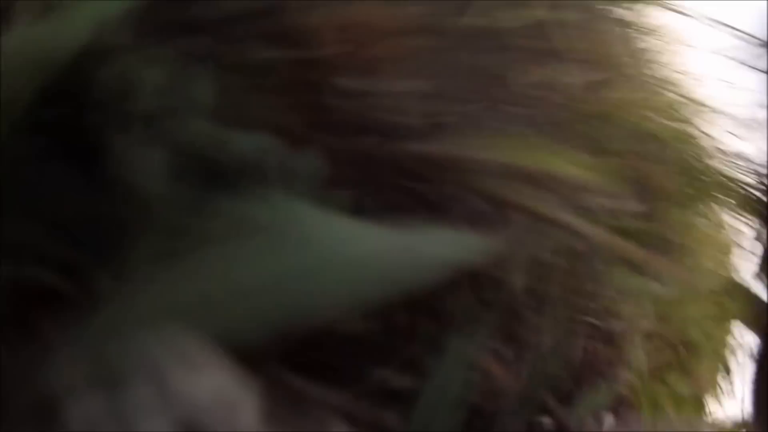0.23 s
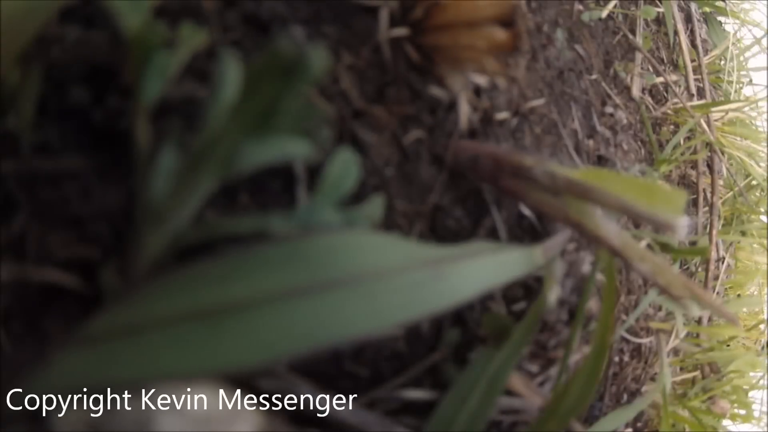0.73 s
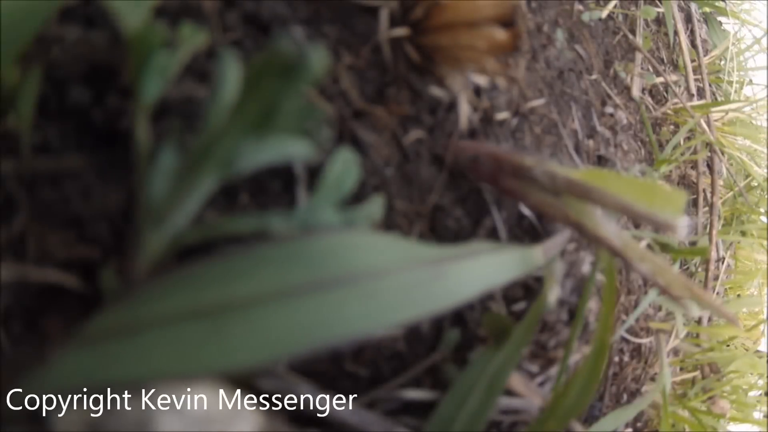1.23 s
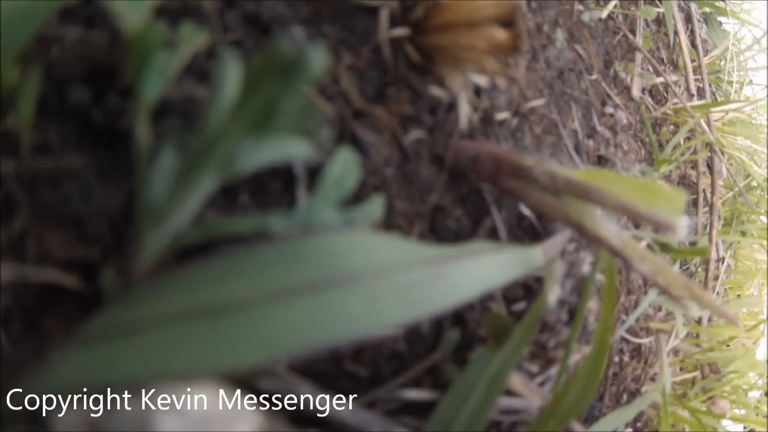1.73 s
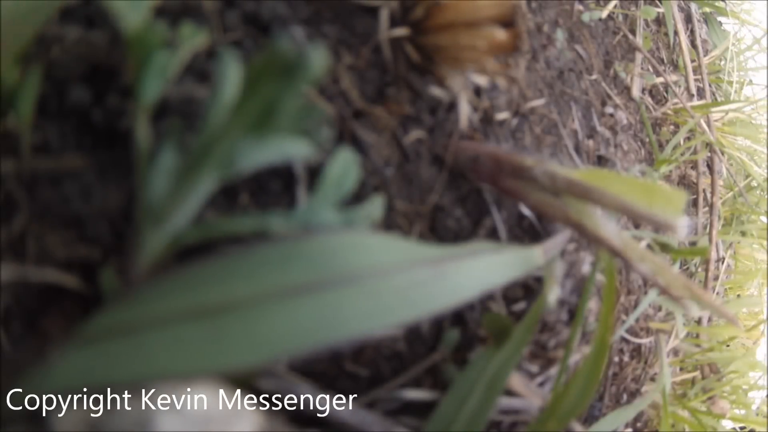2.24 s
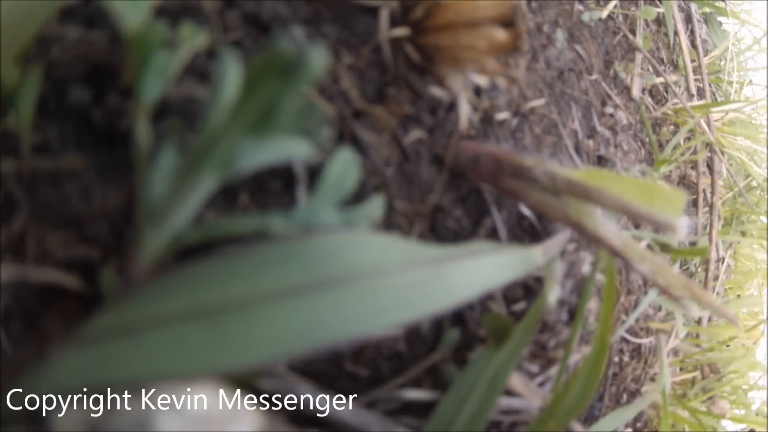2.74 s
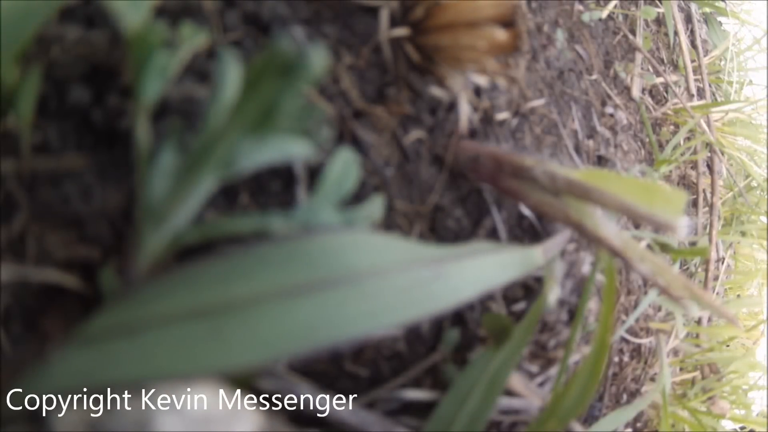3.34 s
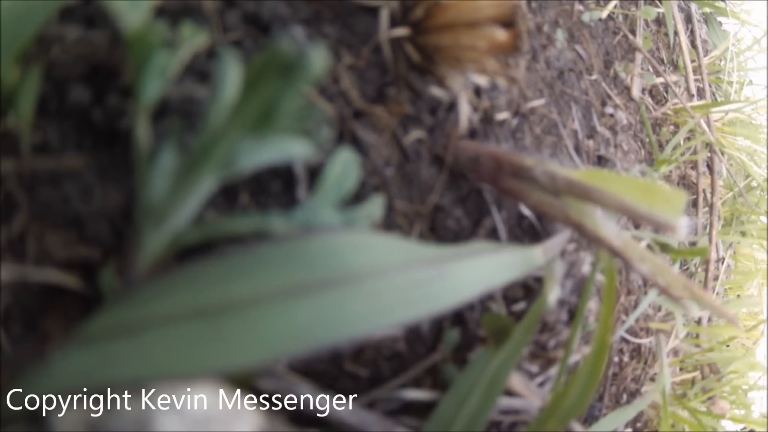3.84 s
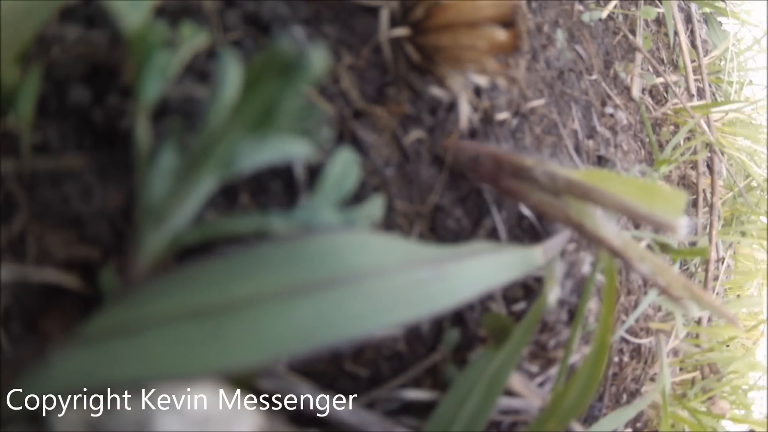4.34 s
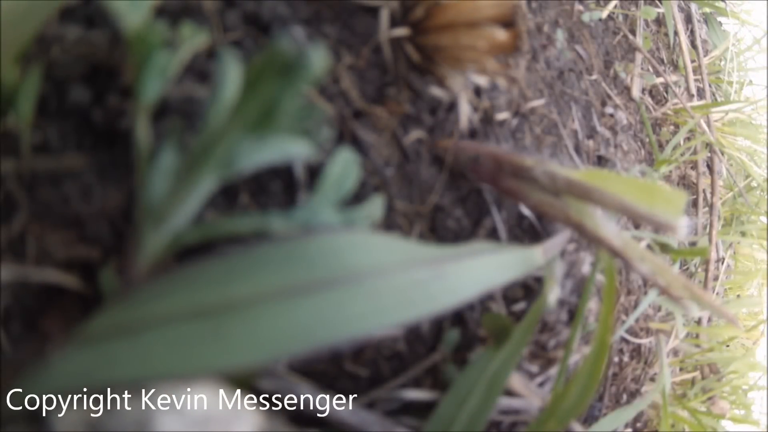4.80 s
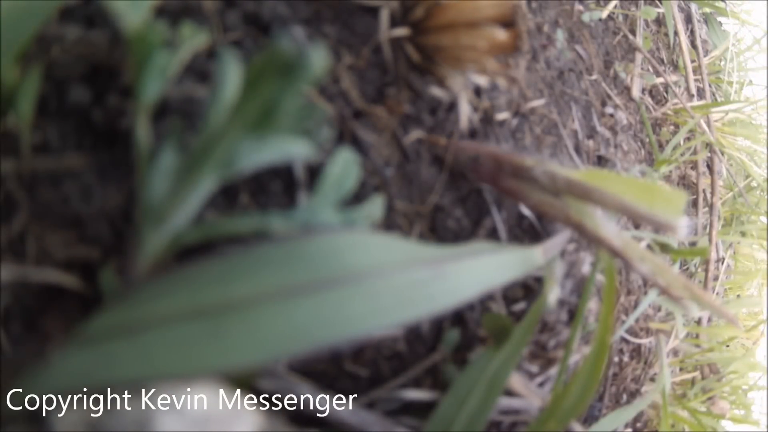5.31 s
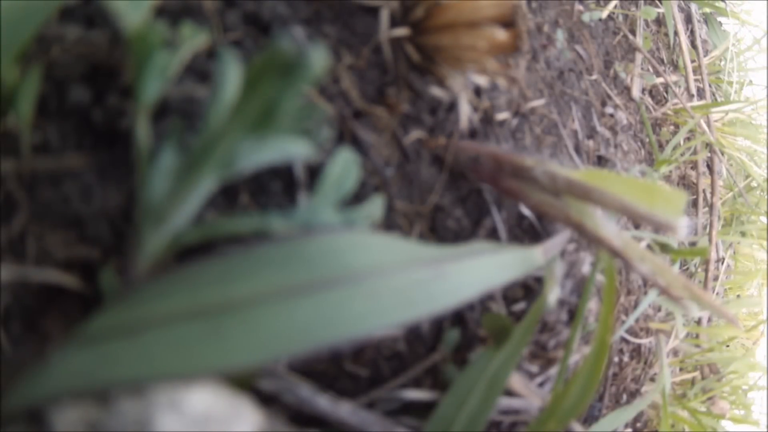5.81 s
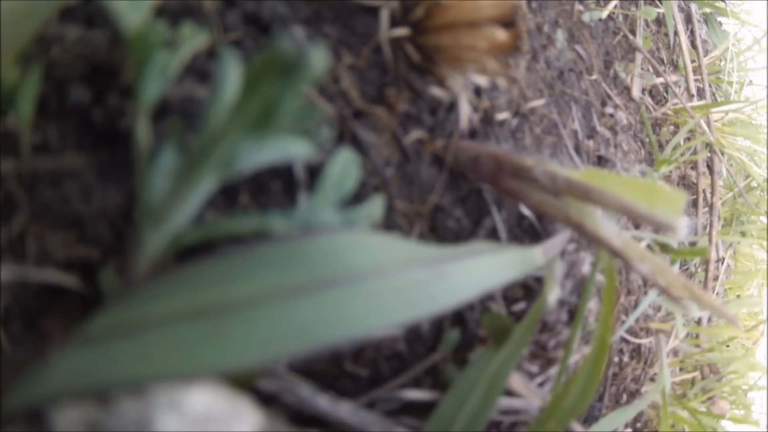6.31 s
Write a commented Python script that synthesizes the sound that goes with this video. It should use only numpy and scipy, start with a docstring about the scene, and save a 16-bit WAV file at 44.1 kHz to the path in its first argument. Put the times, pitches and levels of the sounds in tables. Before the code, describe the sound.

A brief, loud rustling tumble against the microphone gives way to a bird's long run of high, scolding peeps in a pasture.

```python
"""A killdeer scolds in a pasture: a long run of shrill peeps, sung with both sides of its syrinx at once.
As it starts, a cow nudges a small camera, which tumbles through grass and comes to rest on the soil.
Stems scrape and knock on the case, and the cow's shifting thuds through the turf under a dull hush.
The camera holds each sample of a slow converter, which mirrors the whole sound into the treble."""
import sys
import numpy as np
from scipy import signal
from scipy.fft import rfft, irfft
from scipy.io import wavfile
from scipy.ndimage import map_coordinates

SR = 44100
rng = np.random.default_rng(int(sys.argv[2]) if len(sys.argv) > 2 else 0)


def persist_wave(psi):
    """Save psi, clipped to +-1, as 16-bit WAV."""
    counts = np.round(np.clip(psi, -1, 1) * 32767).astype(np.int16)
    wavfile.write(sys.argv[1], SR, np.atleast_2d(counts).T)


N = 289296
TIME_S = np.arange(N) / SR
BIN_HZ = np.arange(N // 2 + 1) * SR / N


def from_db(db):
    """Decibels to gain."""
    return 10 ** (np.asarray(db) / 20)


def unit_rms(x):
    """Scale to unit power."""
    return x / np.sqrt(np.mean(x ** 2) + 1e-20)


def at_hz(points, hz):
    """Interpolate a table on a log-frequency axis."""
    points = np.array(points)
    return np.interp(np.log(np.maximum(hz, 1)), np.log(points[:, 0]), points[:, 1])


def low_pass(x, hz, order=2):
    """Butterworth low-pass."""
    return signal.sosfilt(signal.butter(order, hz, fs=SR, output="sos"), x + 1e-18)


def drift(rate_hz, size):
    """Smooth random curve, spread about 1."""
    steps = np.arange(size) * rate_hz / SR
    return map_coordinates(rng.standard_normal(4096), [steps], order=3, mode="wrap")


def resonate(x, modes):
    """Parallel two-pole resonators of alternating sign."""
    out = 0
    for k, (hz, width_hz, gain_db) in enumerate(modes):
        r = np.exp(-np.pi * width_hz / SR)
        zeros = np.array([1, 0, -1]) * (1 - r * r) / 2
        poles = [1, -2 * r * np.cos(2 * np.pi * hz / SR), r * r]
        out = out + (-1) ** k * from_db(gain_db) * signal.lfilter(zeros, poles, x + 1e-18)
    return out


def add(track, start_s, sound):
    """Mix a sound into a track, starting no earlier than 0 s."""
    i = max(round(start_s * SR), 0)
    track[i:i + len(sound)] += sound[:max(N - i, 0)]


def pitch_arch(progress, crest_hz, crest_frac, scoop_hz, fall_hz, bend=1.7):
    """Pitch scoops up to a crest, then falls ever faster; negative scoop and fall make a dip."""
    rising = np.minimum(progress / crest_frac, 1)
    falling = np.maximum((progress - crest_frac) / (1 - crest_frac), 0)
    return crest_hz - scoop_hz * (1 - rising ** bend) ** 2 - fall_hz * falling ** bend


def second_voice(main_phase, second_phase, strain):
    """The syrinx's other side: coupling adds sum and difference tones, strain adds rasp."""
    beat_phase = 2 * main_phase - second_phase
    tone = np.sin(second_phase)
    upper_tone = np.sin(2 * main_phase + beat_phase)
    weak_tones = (from_db(-6.5) * np.sin(main_phase + beat_phase)
                  + from_db(-8.5) * np.sin(2 * second_phase - main_phase)
                  + from_db(-15) * np.sin(main_phase + second_phase))
    rasp = drift(2500, len(tone)) * tone + 0.5 * drift(2500, len(tone)) * upper_tone
    return tone + upper_tone + weak_tones + from_db(-15 + 12 * strain) * rasp


# Second voice over main, climbing with effort to lock at a fifth: pitch_hz, pitch_ratio
VOICE_RATIO = [(1760, 1.37), (1910, 1.42), (2030, 1.42), (2140, 1.5)]
# Throat and ground reflection on the main voice: freq_hz, gain_db
THROAT_GAIN = [(1750, -23.5), (1900, -19), (2050, -11), (2200, -5), (3450, -3), (3600, 4), (3800, 2),
               (4000, 0.5), (4150, -7), (4300, -1.5), (4500, 5)]


def peep(length_s, arch, level_db, second_db, attack_s=0.0054, release_s=0.018, join_s=0.014, fade_db=1.5):
    """Both sides of the syrinx follow one pitch arch; the second voice swells in just after the main."""
    crest_hz, crest_frac, scoop_hz, fall_hz = arch
    t = np.arange(int(length_s * SR)) / SR
    progress, size = t / t[-1], len(t)
    wander_hz = 0.025 * abs(scoop_hz) * drift(45, size)
    glide_hz = pitch_arch(progress, crest_hz, crest_frac, scoop_hz, fall_hz) + wander_hz
    main_hz = glide_hz * (1 + 0.002 * drift(170, size))
    strain = np.clip((glide_hz.mean() - 1950) / 200, 0, 1)   # high peeps are strained
    shake = (0.002 + 0.011 * strain) * drift(500, size)
    ratio = np.minimum(at_hz(VOICE_RATIO, glide_hz) + 0.063 * (0.5 - progress), 1.5)
    second_hz = glide_hz * ratio * (1 + shake)
    main_phase, second_phase = 2 * np.pi * np.cumsum([main_hz, second_hz], axis=1) / SR
    main = sum(from_db(at_hz(THROAT_GAIN, k * main_hz)) * np.sin(k * main_phase) for k in (1, 2))
    main += from_db(-20) * np.sin(3 * main_phase)
    second = second_voice(main_phase, second_phase, strain)
    swell = np.clip(t / join_s, 0, 1) ** 2
    flutter_db = (1.84 + 2 * strain) * drift(70, size)
    voices = main + swell * from_db(second_db + flutter_db) * second
    ramp = np.clip(np.minimum(t / attack_s, (t[-1] - t) / release_s), 0, 1)
    envelope_db = level_db + fade_db * (0.5 - progress) + 0.97 * drift(60, size)
    return np.sqrt(2) * from_db(envelope_db) * np.sin(np.pi / 2 * ramp) * voices


# Peeps: start_s, end_s, crest_hz, crest_frac, scoop_hz, fall_hz, level_db, second_db
KILLDEER_PEEPS = [(0, 0.082, 2100, 0.4, -22, 80, -30, -26), (0.454, 0.56, 2120, 0.18, 40, 38.5, -51, -30.5),
                  (0.613, .716, 2173, 0.73, 23, 304, -42, -13),
                  (0.779, 0.879, 2266, 0.59, 88, 371, -46.5, -8),
                  (.968, 1.085, 2060, 0.52, 169, -32, -48, -14),
                  (1.181, 1.33, 2019, 0.84, 237, 274, -56.5, -20.5),
                  (1.551, 1.704, 2000, 0.35, 168, 85.5, -65, -29),
                  (1.876, 2.069, 2137, 0.66, 213.5, 140, -61.5, -40),
                  (2.183, 2.347, 2221, 0.44, 191, 57, -56, -29),
                  (2.438, 2.56, 2180, 0.79, 85, 139.5, -52.5, -20),
                  (2.632, 2.777, 2209, 0.2, 187, 52, -51.5, -17.5),
                  (2.863, 2.97, 2192, 0.65, 182, 143.5, -50, -15.5),
                  (3.039, 3.147, 2210, .56, 265, 222.5, -51.5, -17),
                  (3.216, 3.384, 2220, 0.25, 291, 143, -50.5, -18),
                  (3.461, 3.59, 2108, 0.34, 129, 81, -49, -14),
                  (3.648, 3.745, 1984, 0.75, 103, 86, -48.5, -13),
                  (3.814, 3.942, 2129, 0.65, 218, 121, -49.5, -14),
                  (4.002, 4.137, 2005, 0.87, 119, 66, -45.5, -16),
                  (4.185, 4.309, 1920, 0.11, 90, 3.5, -44, -14),
                  (4.352, 4.46, 1936, 0.05, 29, 66, -44, -14.5),
                  (4.509, 4.615, 1918, .54, 66, 74, -44.5, -14),
                  (4.663, 4.761, 1877, 0.24, 21, 38, -45.5, -16),
                  (4.819, 4.922, 1722, 0.29, -55, -101, -46.5, -26.5),
                  (5.037, 5.202, 2149, 0.64, 264.5, 119, -47, -30),
                  (5.27, 5.417, 2091, .34, 250, 147, -44.5, -18),
                  (5.467, 5.592, 1892, 0.42, -31, -17, -44, -14),
                  (5.643, 5.764, 1891, .12, 51, 24, -44.5, -14.5),
                  (5.825, 5.931, 1749, 0.22, -42, -116, -45.5, -22.5),
                  (6.332, 6.39, 2260, 0.21, 81, 343.5, -46, -22.5),
                  (6.376, 6.585, 2168, 0.56, 166, 80, -47.5, -34)]


def killdeer(field_db=-27, field_t60_s=0.15):
    """The run of peeps, with faint scatter back from the field."""
    direct = np.zeros(N)
    for start_s, end_s, *arch, level_db, second_db in KILLDEER_PEEPS:
        add(direct, start_s, peep(end_s - start_s, arch, level_db, second_db))
    t = TIME_S[:SR // 2]
    scatter = rng.standard_normal(len(t)) * from_db(-60 * t / field_t60_s)
    scatter /= np.linalg.norm(scatter)
    return direct + from_db(field_db) * signal.fftconvolve(direct, scatter)[:N]


# Open-air spectrum: freq_hz, relative_density_db
AIR_SPECTRUM = [(15, -25), (35, -4), (70, -1), (250, -3.5), (800, -18), (3400, -24.5), (5500, -26.5)]


def open_air(level_db=-60.5):
    """Steady, dull outdoor hush of shaped noise."""
    spectrum = rfft(rng.standard_normal(N)) * from_db(at_hz(AIR_SPECTRUM, BIN_HZ))
    return from_db(level_db) * unit_rms(irfft(spectrum, N))


# Low modes of the case: freq_hz, width_hz, gain_db
CASE_MODES = [(202.5, 84, 4), (281.5, 82, 3), (348, 78, -2), (1050, 210, -13.5)]
# High modes of its shell: freq_hz, width_hz, gain_db
SHELL_RESONANCES = [(1000, 1000, -9), (1560, 140, 3), (2223, 220, 2.5), (3180, 430, -1.5),
                    (5060, 2400, -13.5)]
# Grass dragging over the case: start_s, end_s, force_db
GRASS_DRAGS = [(0.047, 0.048, -20.5), (0.086, .115, -15.5), (0.166, .295, -18.5), (0.353, 0.399, -26.5),
               (.545, 0.552, -37.5)]


def grass_drags(slips_per_s=2400, scrape_db=-1, grip_db_per_s=903.5, release_db_per_s=299.5):
    """Stems stick and slip on the case: dense clicks into the shell, and a low rumble."""
    force = np.zeros(N)
    for start_s, end_s, force_db in GRASS_DRAGS:
        grip_db = grip_db_per_s * np.maximum(start_s - TIME_S, 0)
        release_db = release_db_per_s * np.maximum(TIME_S - end_s, 0)
        force += from_db(force_db - grip_db - release_db)
    slip_db = 4.5 * np.minimum(rng.exponential(1, N), 4)
    signs = rng.choice([-1, 1], N)
    slips = from_db(slip_db) * signs * (rng.random(N) < slips_per_s / SR)
    scrape = from_db(scrape_db) * unit_rms(resonate(slips, SHELL_RESONANCES))
    rocking = resonate(rng.standard_normal(N), [(61.7, 64, -3)] + CASE_MODES)
    rumble = unit_rms(low_pass(rocking, 600))
    return force * (scrape + rumble)


# Contacts, from the tumble to small ticks of stems: start_s, thump_db, crack_db
CASE_KNOCKS = [(0.057, -4.5, -4.5), (0.091, -1.5, -14.5), (0.132, -2, 2), (0.164, -6.5, -19),
               (0.185, -12.5, -32), (0.212, -2, -11), (0.227, -11.5, -15), (0.271, -7, -28), (0.279, 2, -6),
               (0.288, 2.5, -10), (0.294, 7, 2), (0.340, -9, -2.5), (0.377, -26.5, -16.5),
               (0.387, -31, -12.5), (0.437, 11.5, 3), (0.536, -36, -16.5), (1.162, -48.5, -50),
               (1.951, -73.5, -43.5), (3.16, -66, -44), (4.268, -60, -54), (6.241, -67.5, -49)]


def case_knocks(thump_gain_db=-5, crack_gain_db=8, crack_decay_s=0.0023, give_s=0.000096):
    """Each contact rocks the case in its low modes and crunches briefly on its shell."""
    thumps, cracks, t = np.zeros(N), np.zeros(N), TIME_S[:SR // 10]
    pressing = 1 - np.exp(-t / give_s)   # soil and stems give a little
    for start_s, thump_db, crack_db in CASE_KNOCKS:
        ring = sum(from_db(db + rng.normal(0, 2)) * np.exp(-np.pi * width_hz * t)
                   * np.sin(2 * np.pi * hz * t) for hz, width_hz, db in CASE_MODES)
        add(thumps, start_s, -from_db(thump_db + thump_gain_db) * pressing * ring)
        burst = rng.standard_normal(len(t)) * np.exp(-t / crack_decay_s)
        add(cracks, start_s, from_db(crack_db + crack_gain_db) * burst)
    thumps -= low_pass(thumps, 100, order=1)   # thumps swing evenly about rest, with no lasting push
    return thumps + resonate(cracks, SHELL_RESONANCES)


# Thuds, peaking no earlier than 0.25 s: peak_s, pitch_hz, half_length_s, level_db
TURF_THUDS = [(0.03, 49.82, 0.009, -30), (0.621, 74, 0.1, -45), (0.754, 219.5, 0.0048, -42),
              (0.907, 78, 0.0088, -42.5), (1.041, 121.5, 0.037, -48), (1.17, 141, 0.042, -43),
              (1.549, 67.7, 0.035, -51.5), (1.725, 72, 0.072, -54)]


def cow_thuds(waver_rad=0.84):
    """The cow shifts: soft low swells through the turf, each around one wavering pitch."""
    out = np.zeros(N)
    t = np.arange(-SR // 4, SR // 4) / SR
    for peak_s, pitch_hz, half_length_s, level_db in TURF_THUDS:
        swell = np.exp(-(t / half_length_s) ** 2 / 2)
        phase = 2 * np.pi * pitch_hz * t + waver_rad * drift(38, len(t))
        add(out, peak_s + t[0], from_db(level_db) * swell * np.sin(phase))
    return out


def scene():
    """All sources at one microphone, on two identical channels."""
    mono = killdeer() + case_knocks() + grass_drags() + cow_thuds() + open_air()
    return np.array([mono, mono])


def record(dry, band_hz=5550, converter_hz=12000, cutoff_hz=15250):
    """Overload, then sample-and-hold: images around the converter rate, sinc droop, top cut."""
    band = low_pass(np.clip(dry, -1, 1), band_hz, order=10)
    mirrored = band * (1 + 2 * np.cos(2 * np.pi * converter_hz * TIME_S))
    held = irfft(rfft(mirrored) * np.sinc(BIN_HZ / converter_hz), N)
    top_cut = signal.ellip(14, 0.1, 90, cutoff_hz, fs=SR, output="sos")
    return signal.sosfilt(top_cut, np.clip(held, -1, 1))


dry = scene()
out = record(dry)
persist_wave(out)
```